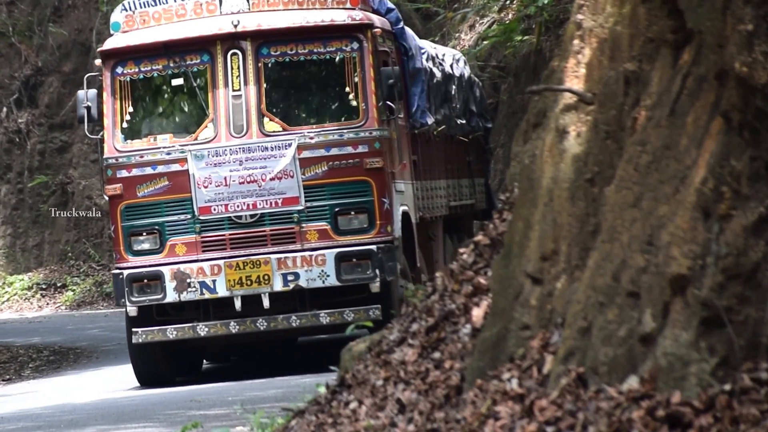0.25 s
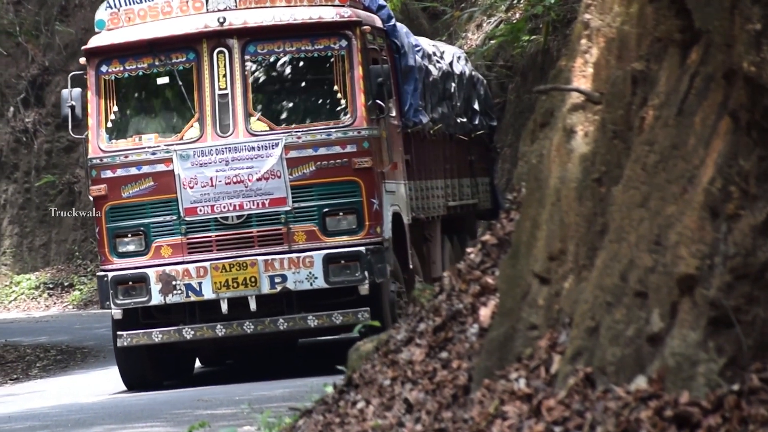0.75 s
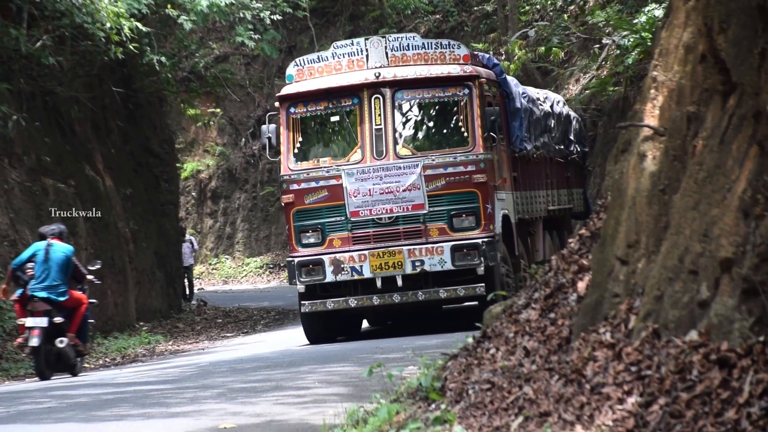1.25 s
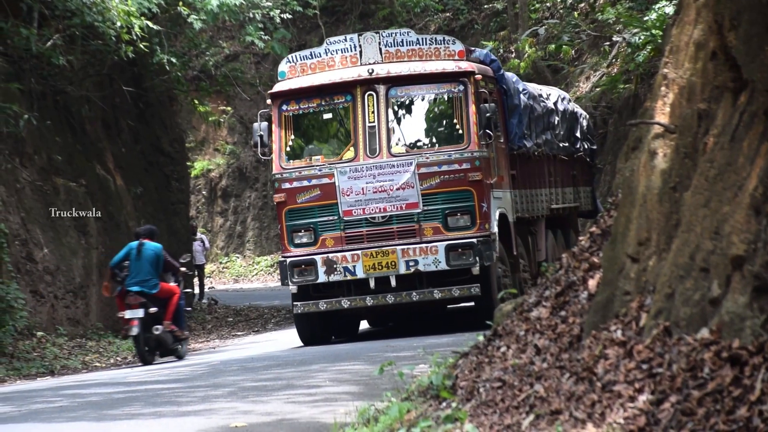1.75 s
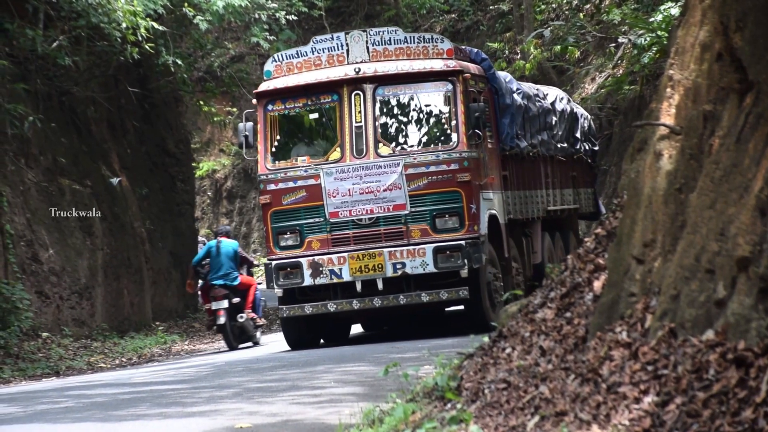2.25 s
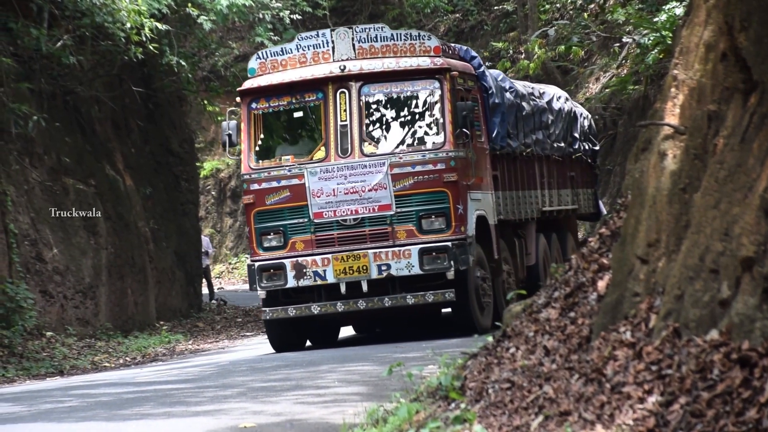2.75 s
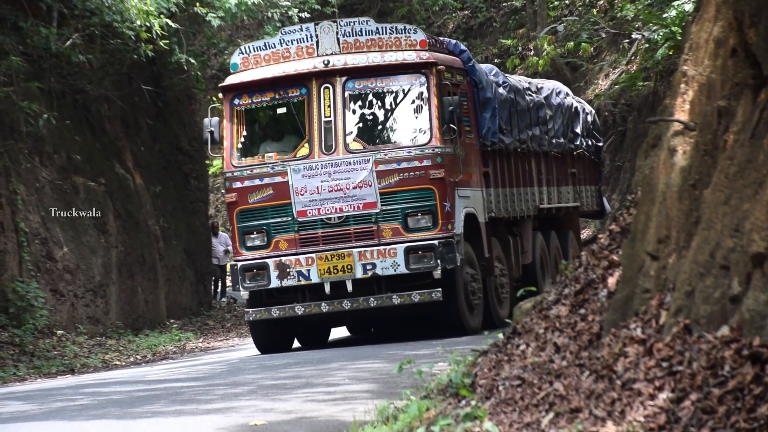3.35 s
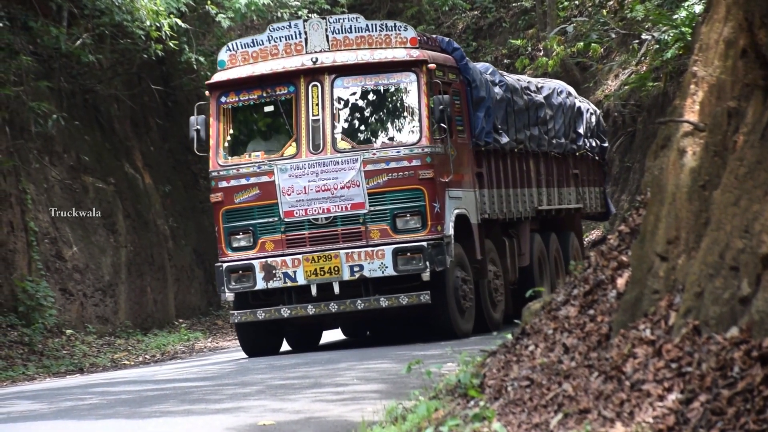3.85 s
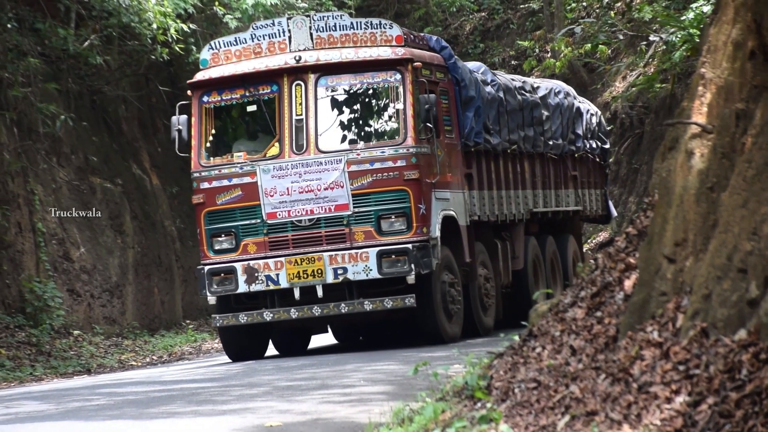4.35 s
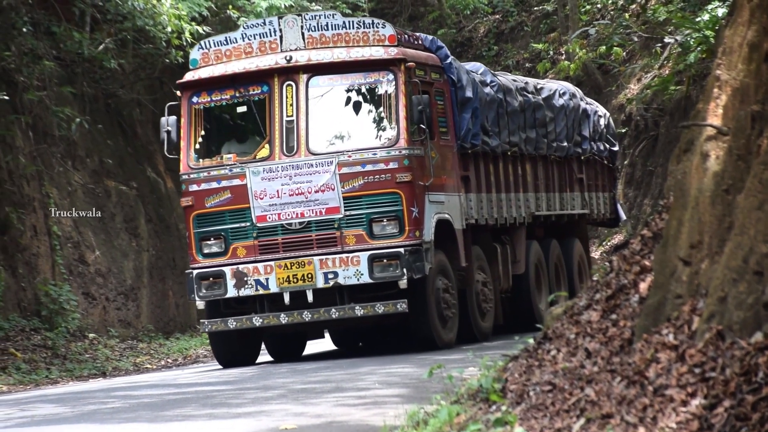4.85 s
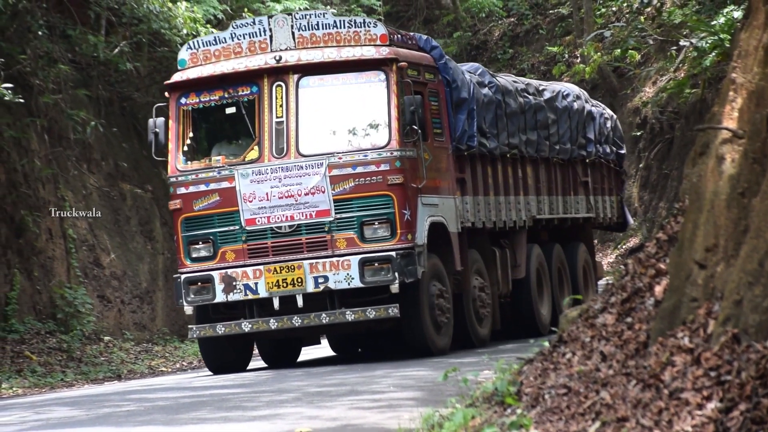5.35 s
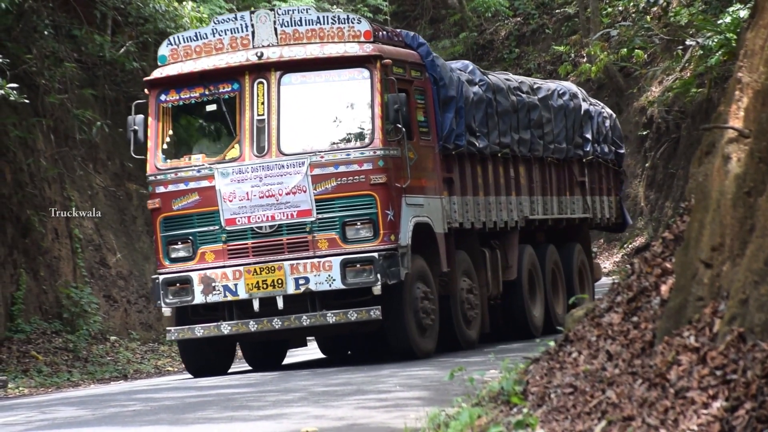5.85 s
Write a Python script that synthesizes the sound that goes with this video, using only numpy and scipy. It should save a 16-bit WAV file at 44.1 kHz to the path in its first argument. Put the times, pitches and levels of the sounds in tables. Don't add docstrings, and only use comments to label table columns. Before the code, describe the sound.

Outdoors on a wooded road between earth banks, a heavy diesel lorry roars steadily with whining gears and thin, high brake squeal. A motorbike rumbles past and toots, almost at once covered by a long, very loud two-note air horn. Brakes squeal again, then two short blasts follow, echoing away. More squealing and air hisses lead to a sharp stone crack. The stereo microphone sounds thin, and its automatic gain ducks the engine under the horn.

```python
import sys
import numpy as np
from scipy import signal
from scipy.io import wavfile
from scipy.ndimage import uniform_filter1d

SR = 44100
rng = np.random.default_rng(int(sys.argv[2]) if len(sys.argv) > 2 else 0)


def log_audio(samples):
    frames = np.atleast_2d(samples).T
    limited = np.clip(frames, -1, 1)
    pcm = np.round(limited * 32767).astype(np.int16)
    wavfile.write(sys.argv[1], SR, pcm)


def gain_from_decibels(decibels):
    exponent = np.asarray(decibels, float) / 20
    return 10 ** exponent


N = 269010

# pitch_hz, density_db_per_hz
ROAR_SPECTRUM = [(24, -74), (40, -73), (132, -44), (218, -10), (387, -11.5), (522, -3.5), (722, -6),
                 (973, -2.5), (1220, -4.5), (1960, -5), (2990, -14.5), (3390, 2), (3650, -16), (10100, -34),
                 (15500, -68)]
# pitch_hz, likeness_0_to_1
ROAR_LIKENESS = [(60, 0.8), (180, 0.99), (550, 0.96), (1650, 0.97), (4970, 0.8), (15000, 0.98)]
# pitch_hz, left_over_right_db
ROAR_LEAN = [(60, -4), (240, -1), (950, 3), (3770, 1.5), (15000, 4.5)]
# pitch_hz, level_db
GEAR_LINES = [(796.7, -50.5), (952.8, -46.5), (1410, -67), (1491, -49.5)]
# start_s, end_s, level_db, pitch_hz
EXHAUST_ORDERS = [(2.7, 3.7, -57, 245), (2.7, 3.7, -60, 203), (4.2, 5.7, -58, 226), (4.2, 5.7, -61, 265),
                  (4.2, 5.6, -55, 530)]
# start_s, end_s, level_db
VALVE_PUFFS = [
    (3.5, 3.65, -52),
    (5.11, 5.25, -53),
    (5.72, 5.83, -55),
]
# start_s, end_s, level_db
RUMBLES = [
    (-.2, 1.0, -41.5),
    (5.58, 5.88, -45.5),
]
# start_s, end_s, level_db
TOOTS = [
    (1.075, 1.7, -43),
    (3.25, 3.65, -55),
]
# pitch_hz, level_db
TOOT_PARTIALS = [(284.2, -1), (399.1, 1), (1421, -4), (1596, -5), (2837, -12), (3123, 0), (3193, 10),
                 (3812, -2)]
# start_s, peak_db, ring_hz, left_over_right_db
STONE_CRACKS = [
    (5.5446, -28.5, 3350, 13),
    (5.6727, -17, 2750, -32),
    (5.6764, -1, 3620, 11.5),
    (5.685, -23, 3230, 7),
]
# start_s, end_s, level_db
SQUEALS = [(0.01, 1.106, -49), (2.809, 3.152, -46), (3.204, 3.26, -44), (4.445, 4.798, -45),
           (4.82, 5.194, -44), (5.19, 5.726, -42.5), (5.753, 5.944, -53.5)]
SQUEAL_PITCHES_HZ = [3297, 3300, 3320, 3285, 3262, 3290, 3295]
# start_s, end_s, level_db
ROUGH_SHRIEKS = [(1.085, 1.3, -38), (1.19, 1.3, -34), (3.262, 3.44, -43.5), (3.32, 3.44, -43.5),
                 (3.46, 3.66, -35.5)]
# pitch_hz, width_hz, level_db
SHRIEK_BANDS = [(3050, 40, -12), (3260, 70, -1), (3323, 23, 1.5), (3920, 1600, -12), (3710, 29, -17),
                (13100, 300, -19)]
# start_s, end_s, level_db
SIDE_SQUEALS = [
    (3.51, 3.6, -36),
]
# delay_s, level_db, left_over_right_db
BANK_ECHOES = [(.117, -20, 4.5), (.19, -17.5, 2.5), (.27, -26, 5), (.36, -28, 1.5)]
# start_s, silent_by_s
HORN_BLASTS = [
    (1.238, 2.9),
    (3.645, 4.35),
]
# press_s, release_s, level_db, release_swell_db (high trumpet's fundamental)
BUTTON_STROKES = [
    (1.236, 2.642, -12, 39),
    (3.646, 3.81, -10.5, 11),
    (3.867, 4.052, -11, 12),
]
# partial, level_db
HIGH_BELL = [(1, -22.5), (2, -0.5), (3, -9), (4, -7.5), (5, -10), (6, -15.5), (7, -14.5), (8, -19),
             (9, -17.5), (10, -27), (11, -29), (12, -23.5), (13, -23.5), (14, -26)]
# partial, level_db
LOW_BELL = [(1, -14.5), (2, -10.5), (3, -2), (4, -0.5), (5, -2.5), (6, -1), (7, -3), (8, -13.5), (9, -7.5),
            (10, -13), (11, -12), (12, -11.5), (13, -11), (14, -12.5), (15, -16.5), (16, -30.5)]
# partial, share, beat_hz, null_s
HIGH_BEATS = [(1, 0.84, 3.8, 1.66), (2, 0.32, .86, 2.756), (3, 0.72, 1.53, 2.246), (4, .31, 1.87, 2.09),
              (5, 0.43, 0.99, 2.82), (6, 0.52, 1.15, 2.074), (7, 0.61, 0.9, 2.39), (8, 0.29, 0.28, 4.4),
              (9, .57, 1.17, 2.05), (10, 0.44, 0.61, 3.1)]
# partial, share, beat_hz, null_s
LOW_BEATS = [(1, 0.28, 0.45, 3.07), (2, .48, 1.45, 2.524), (3, 0.61, 2.54, 1.808), (4, 0.46, 0.304, 5),
             (5, .4, 3.17, 2.13), (6, 0.45, 0.98, 2.19), (7, 0.59, 0.65, 2.64), (8, 0.48, 1.48, 2.16),
             (9, 0.38, 0.8, 2.38)]


def rms_one(x):
    return x / np.sqrt(np.mean(x ** 2) + 1e-20)


def at_hz(points, hz):
    points_hz, values = np.transpose(points)
    return np.interp(np.log(hz), np.log(points_hz), values)


def band(x, low_hz, high_hz, order=2):
    return signal.sosfilt(signal.butter(order, [low_hz, high_hz], "band", fs=SR, output="sos"), x)


def resonate(x, hz, width_hz):
    r = np.exp(-np.pi * width_hz / SR)
    return signal.lfilter([1 - r * r, 0, r * r - 1], [2, -4 * r * np.cos(2 * np.pi * hz / SR), 2 * r * r], x)


def pan(x, left_db):
    return np.array([x * gain_from_decibels(left_db / 2), x * gain_from_decibels(-left_db / 2)])


def tone(hz):
    return np.sin(2 * np.pi * np.cumsum(hz) / SR)


def drift(rate_hz, spread_db=None):
    r = np.exp(-80 * np.pi * rate_hz / SR)
    white = rng.standard_normal(N // 40 + 2002)
    slow = rms_one(signal.lfilter([1], [1, -2 * r, r * r], white)[2000:])
    if spread_db is not None:
        slow = gain_from_decibels(spread_db * slow)
    return np.interp(np.arange(N) / 40, np.arange(len(slow)), slow)


def swells(rows, rise_s, fall_s):
    t = np.arange(N) / SR
    gain = 0
    for start_s, end_s, level_db, *_ in rows:
        rise = np.clip((t - start_s) / rise_s, 0, 1)
        fall = np.exp(-(np.maximum(t - end_s, 0) / fall_s) ** 2)
        gain = gain + gain_from_decibels(level_db) * rise * fall
    return gain


def banded_noise(spectrum, patchy_db):
    out, together = 0, drift(2.5, 0.6 * patchy_db)
    edges_hz = 40 * 2 ** (np.arange(23) * 0.4)
    white = rng.standard_normal((2, 2, N))
    for k, (low_hz, high_hz) in enumerate(zip(edges_hz, edges_hz[1:])):
        hz = np.sqrt(low_hz * high_hz)
        mid, side = band(white[k % 2], low_hz, high_hz)
        alike = np.clip(at_hz(ROAR_LIKENESS, hz), 0, 0.995)
        both = np.sqrt(1 + alike) * mid + np.sqrt(1 - alike) * side * [[1], [-1]]
        lean = pan(1, at_hz(ROAR_LEAN, hz))[:, None]
        out = out + gain_from_decibels(at_hz(spectrum, hz)) * drift(18, patchy_db) * both * lean
    return rms_one(out * together)


def engine_tones():
    whine = 0
    for hz, level_db in GEAR_LINES:
        whine = whine + gain_from_decibels(level_db - 1) * drift(4, 2.5) * tone(hz + 6 * drift(12))
    whine = whine + gain_from_decibels(-63) * drift(6.3, 3.5) * tone(92 + 1.3 * drift(3.7))
    speed = 1 + 0.006 * drift(4)
    for row in EXHAUST_ORDERS:
        level = swells([row], rise_s=0.15, fall_s=0.089) * drift(4.3, 2.9)
        whine = whine + level * tone(row[3] * speed)
    return whine


def engine():
    roar_db, thud_db, leak_db = -37.5, -57.5, -54.5
    turns = np.cumsum(17.5 * (1 + 0.06 * drift(1.87))) / SR
    knock = 1 + 0.015 * np.cos(2 * np.pi * turns)
    fired = np.diff(np.floor(turns), prepend=0) * drift(25, 4.5)
    rough_firing = fired + 0.014 * rng.standard_normal(N)
    thud = rms_one(resonate(resonate(rough_firing, 202, 67), 232, 180))
    air = rng.standard_normal((2, N))
    hiss = rms_one(band(air[0] + 0.41 * air[1] * [[1], [-1]], 3000, 14200))
    hiss_level = gain_from_decibels(leak_db) + swells(VALVE_PUFFS, rise_s=0.044, fall_s=0.044)
    roar = gain_from_decibels(roar_db) * knock * banded_noise(ROAR_SPECTRUM, patchy_db=0.66)
    exhaust = pan(gain_from_decibels(thud_db) * thud + engine_tones(), 0.66)
    return roar + exhaust + hiss_level * hiss * pan(1, 1.5)[:, None]


def rumble():
    air = rng.standard_normal((2, N))
    low = rms_one(band(air[0] + 0.5 * air[1] * [[1], [-1]], 70, 630))
    level = swells(RUMBLES, rise_s=0.056, fall_s=0.17) * drift(7.1, 2.8)
    return level * low * pan(0.84, -2.8)[:, None]


def motorbike_horn():
    t = np.arange(N) / SR
    buzz = 0
    for hz, level_db in TOOT_PARTIALS:
        buzz = buzz + gain_from_decibels(level_db) * drift(4.8, 2.4) * np.sin(2 * np.pi * hz * t)
    return swells(TOOTS, rise_s=0.025, fall_s=0.027) * buzz


def stone():
    out, t = np.zeros((2, N)), np.arange(1200) / SR
    for start_s, peak_db, ring_hz, left_db in STONE_CRACKS:
        burst = np.pad(rng.standard_normal(1200) * np.exp(-t / 0.0013), (0, 3600))
        chip = resonate(burst, ring_hz, 490) + 0.35 * resonate(burst, 2820, 300) + 0.073 * burst
        rim = 0.24 * resonate(burst, 5150, 17)
        bright = gain_from_decibels(peak_db - 11) * band(burst, 7700, 14500)
        crack = band(chip, 1100, 9600) + rim + bright
        at = int(start_s * SR)
        out[:, at:at + len(burst)] += pan(gain_from_decibels(peak_db) * crack / np.abs(crack).max(), left_db)
    return out


def brakes_and_shrieks():
    start_s, end_s, _ = np.transpose(SQUEALS)
    hz = np.interp(np.arange(N) / SR, (start_s + end_s) / 2, SQUEAL_PITCHES_HZ)
    phase = 2 * np.pi * np.cumsum(hz + 6.1 * drift(30.7)) / SR
    grip = swells(SQUEALS, rise_s=0.02, fall_s=0.02) * np.clip(0.94 + 0.5 * drift(35), 0.12, 1.6)
    octave = gain_from_decibels(-13.5) * drift(3, 3) * np.sin(2 * phase)
    squeal = grip * (gain_from_decibels(3.5) * np.sin(phase) + octave)
    cluster = 0
    for mode_hz, width_hz, level_db in SHRIEK_BANDS:
        rung = resonate(resonate(rng.standard_normal(N), mode_hz, width_hz), mode_hz, width_hz)
        cluster = cluster + gain_from_decibels(level_db) * rms_one(rung)
    shriek = gain_from_decibels(3) * swells(ROUGH_SHRIEKS, rise_s=0.0082, fall_s=0.0086) * rms_one(cluster)
    side_level = drift(30, 1.5) * swells(SIDE_SQUEALS, rise_s=0.015, fall_s=0.04)
    return squeal + shriek + side_level * tone(2998 + 8 * drift(30))


def near_bank(x):
    n = np.arange(N)
    lag = SR * (0.0085 - 0.000342 * n / SR + 0.00004 * drift(0.9))
    ears = [np.interp(n - lag - extra_samples, n, x) for extra_samples in (0, 7.5)]
    return np.array(ears) * gain_from_decibels(-25.5)


def banks(x):
    t = np.arange(SR) / SR
    leaves = rng.standard_normal((2, SR)) * np.minimum(t / 0.021, 1)
    leaves[1] = 0.84 * leaves[0] + 0.31 * leaves[1]
    tail = leaves * gain_from_decibels(-60 * t / 1.12 - 45.5)
    for delay_s, level_db, left_db in BANK_ECHOES:
        tail[:, int(delay_s * SR)] += pan(gain_from_decibels(level_db), left_db)
    treble = band(rng.standard_normal((2, SR)), 3600, 16400, order=1) * gain_from_decibels(-60 * t / 0.6 - 39)
    tail = band(tail, 600, 8700, order=1) + treble
    return signal.fftconvolve(x[None], tail, axes=1)[:, :N]


def trumpet(hz, start_s, beats, bell, upper_db, bright_db, lowest_db, sharp, fall_db, flutter_db):
    t = np.arange(len(hz)) / SR
    phase = 2 * np.pi * np.cumsum(hz * (1 + sharp * np.exp(-t / 0.01428))) / SR
    out, knots = 0, rng.standard_normal((46, 200))
    for k in range(1, int(15500 / hz[0])):
        top = min(k, len(bell))
        wander_db = flutter_db * np.interp(t * (8.34 + 1.5 * k), np.arange(200), knots[k])
        fade = gain_from_decibels(wander_db)
        if k <= len(beats):
            _, share, beat_hz, null_s = beats[k - 1]
            bank_copy = share * np.exp(2j * np.pi * beat_hz * (t + start_s - null_s))
            fade = gain_from_decibels(1.6 * share ** 2 * wander_db) * np.abs(1 - bank_copy)
        bell_db = bell[top - 1][1] - fall_db * (k - top)
        level_db = 2 + upper_db + bell_db + bright_db * min(k / 12, 1.3) + lowest_db * (k == 1)
        out = out + gain_from_decibels(level_db) * fade * np.sin(k * phase + 9 * knots[0, k % 12] + k * k)
    valve = sum(np.cos(k * phase + k * k) * gain_from_decibels(-1.5 * k) for k in range(1, 8))
    return out, valve


def air_horn():
    line = dict(rise_s=0.014, fall_s=0.06)
    out, pressure = np.zeros(N), swells(BUTTON_STROKES, **line) + 1e-4
    presses = [(press_s, release_s, 0) for press_s, release_s, *_ in BUTTON_STROKES]
    held = np.minimum(swells(presses, **line) + 1e-4, 1)
    shake_hz = 0.53 * drift(16.6)
    for blast, (start_s, end_s) in enumerate(HORN_BLASTS):
        cut = slice(int(start_s * SR), int(end_s * SR))
        t = np.arange(cut.stop - cut.start) / SR
        upper_db, held_db = 20 * np.log10(pressure[cut]), 20 * np.log10(held[cut])
        lost = 1 - held[cut]
        bend_hz = 6 * lost + shake_hz[cut]
        high_hz = 444.5 + 1.2 * t + 1.0 * blast + bend_hz
        low_hz = 346.3 + 0.3 * t + 0.3 * blast + bend_hz
        dulling_db = 0.23 * held_db
        thump_db = 11 * np.exp(-t / 0.015)
        lead_db = 0.5 - 7.5 * np.exp(-t / 0.018)
        release_db = BUTTON_STROKES[blast][3] * lost * (t > 0.1)
        high, high_valve = trumpet(
            high_hz, start_s, HIGH_BEATS, HIGH_BELL, upper_db - 0.5 + lead_db, dulling_db + 0.5,
            -6 + 9 * blast + thump_db + release_db, sharp=0.1315, fall_db=-1.5, flutter_db=4.5)
        low, low_valve = trumpet(
            low_hz, start_s, LOW_BEATS, LOW_BELL, upper_db - 10.5 - lead_db + held_db, dulling_db + 2.5,
            7 + 0.59 * thump_db - held_db, sharp=0.022, fall_db=0.5, flutter_db=2.5)
        shared = gain_from_decibels(upper_db - 11) * rms_one(band(high_valve * low_valve, 1360, 2800))
        riding = gain_from_decibels(-7.5 - upper_db) * np.diff(high * low, prepend=0)
        leak = rms_one(band(rng.standard_normal(len(t)), 1100, 4000, order=1))
        air = gain_from_decibels(upper_db - 20) * leak
        opening = np.tanh((t / 0.0053) ** 2)
        out[cut] = (high + low + shared + riding + air) * opening
    return out


def scene():
    horn = band(band(air_horn(), 300, 7530), 110, 7820)
    sway_samples = SR * 0.00014 * drift(6.9)
    far_horn = np.interp(np.arange(N) - sway_samples, np.arange(N), horn)
    cracks = stone()
    background = engine() + rumble() + pan(motorbike_horn(), 0.5) + cracks + pan(brakes_and_shrieks(), 4)
    return background + banks(far_horn + 0.13 * cracks[0]) + near_bank(horn) + pan(horn, 2.47)


def gain_control(x):
    knee_db, squeeze, dead_s = -27, 0.43, 0.064
    power = uniform_filter1d(np.mean(x ** 2, axis=0), size=1500)
    over_db = np.maximum(10 * np.log10(power + 1e-9) - knee_db, 0)

    def lagged(lag_s):
        r = np.exp(-1 / SR / lag_s)
        return signal.sosfilt([[1 - r, 0, 0, 1, -r, 0]] * 2, over_db)

    brisk_db, steady_db = lagged(0.048), lagged(0.071)
    late_db = np.interp(np.arange(N) - dead_s * SR, np.arange(N), brisk_db)
    return gain_from_decibels(-squeeze * np.minimum(steady_db, late_db))


def roll_off(x):
    return signal.sosfilt(signal.butter(12, 16510, fs=SR, output="sos"), x)


def record(dry):
    x = band(dry, 45, 9500, order=1)
    x = x * gain_control(x)
    overload = 0.02 * np.maximum(np.abs(x) - 0.4, 0) ** 2
    rounded = band(0.81 * np.tanh(x / 0.81), 248, 9650)
    noisy = rounded + overload + gain_from_decibels(-69) * rng.standard_normal(x.shape)
    mix = signal.sosfilt(signal.cheby2(10, 50, 16400, fs=SR, output="sos"), noisy)
    return roll_off(mix)


dry = scene()
out = record(dry)
log_audio(out)
```